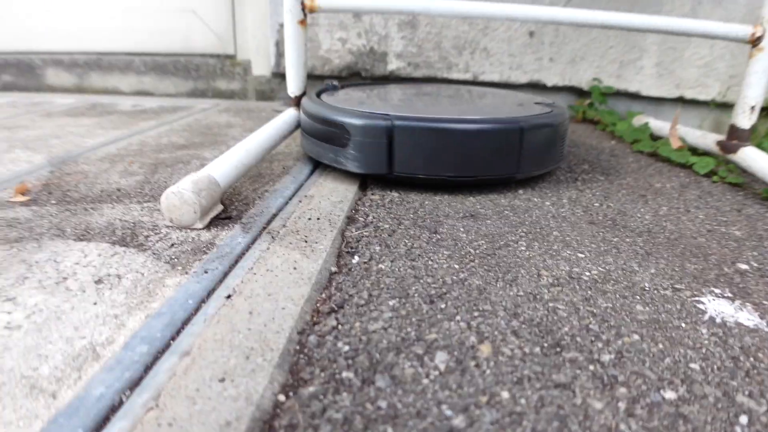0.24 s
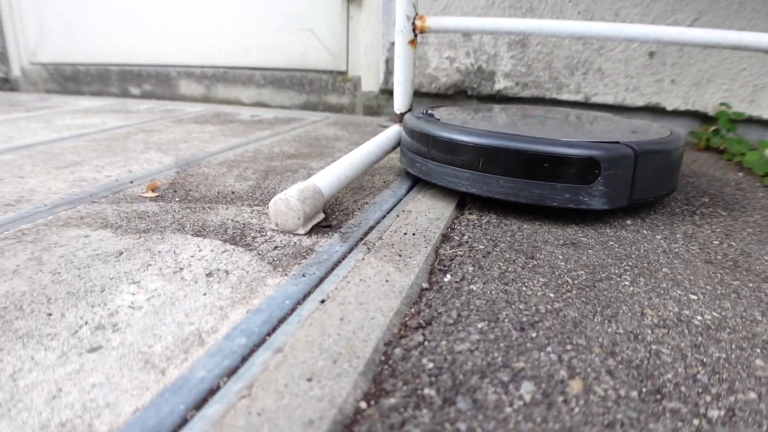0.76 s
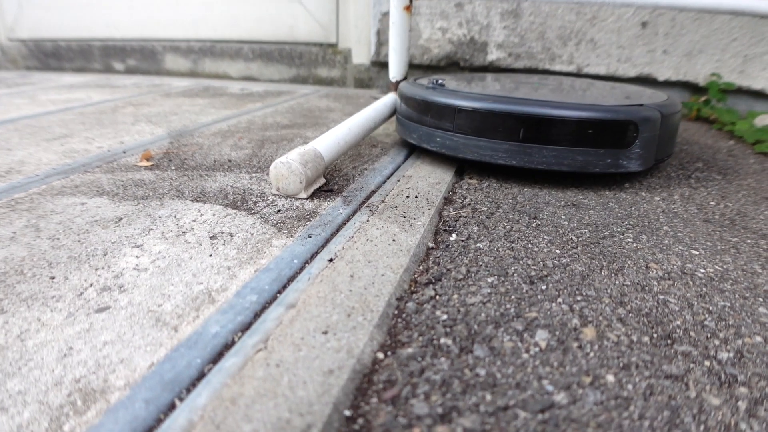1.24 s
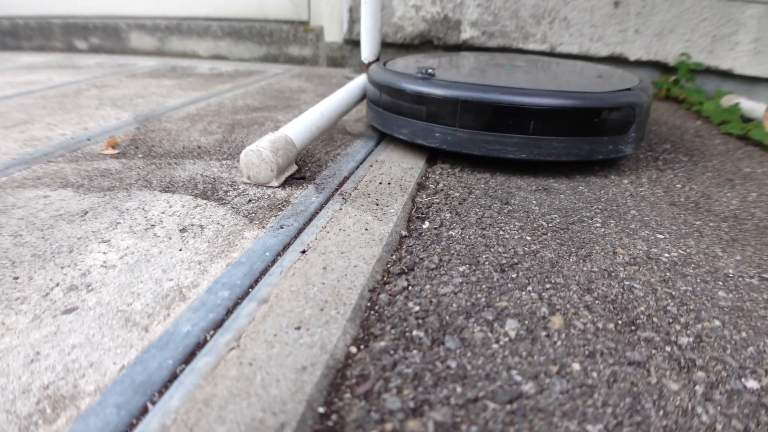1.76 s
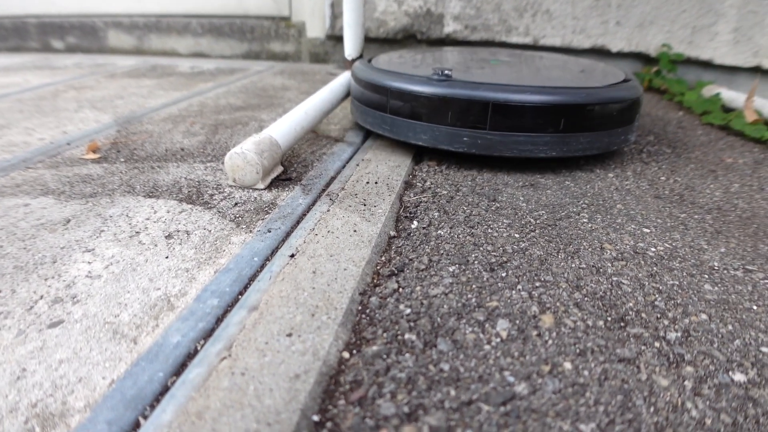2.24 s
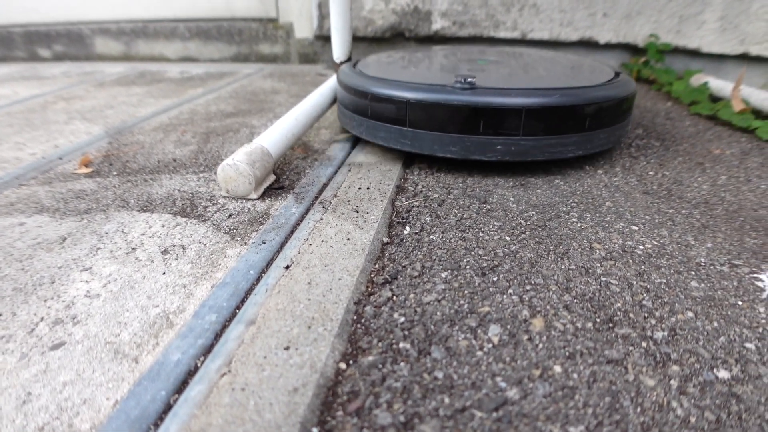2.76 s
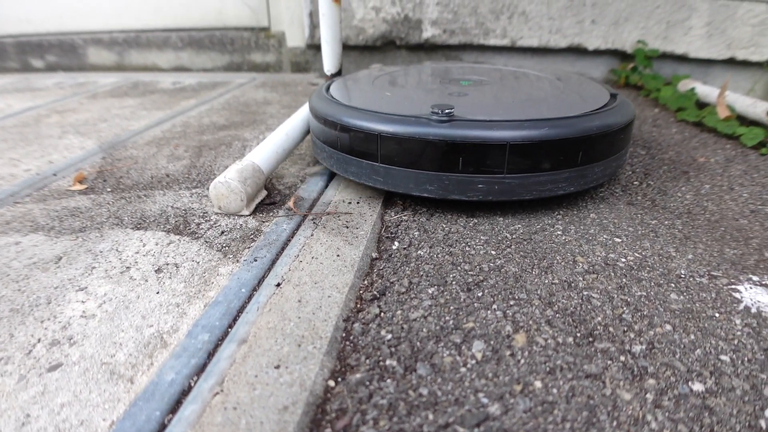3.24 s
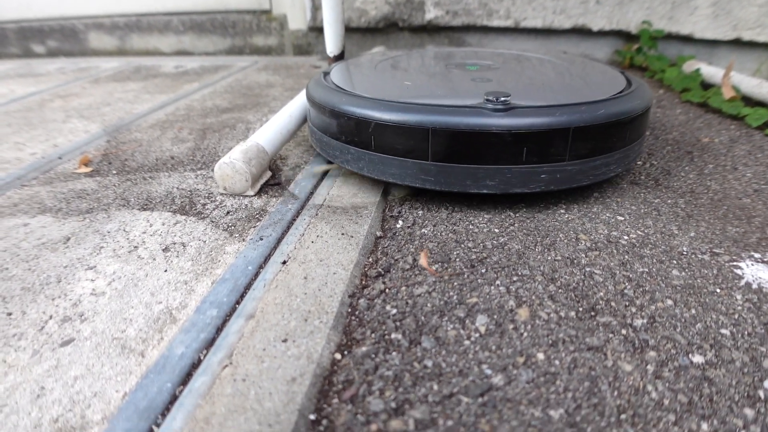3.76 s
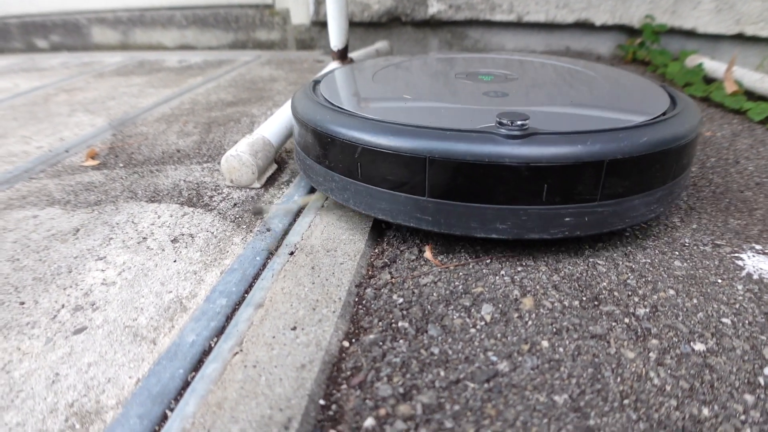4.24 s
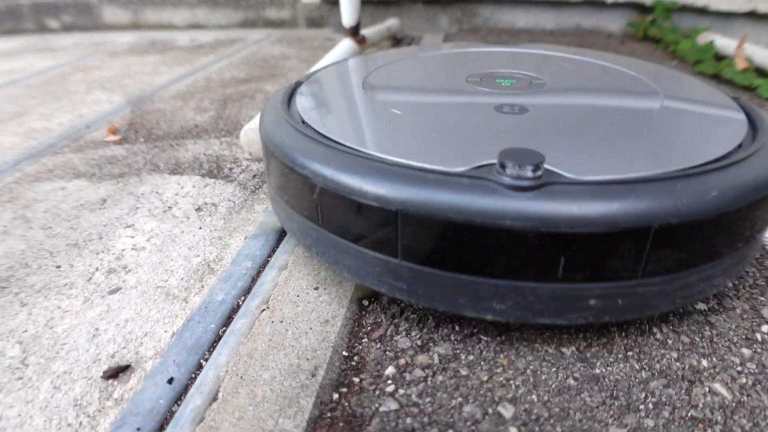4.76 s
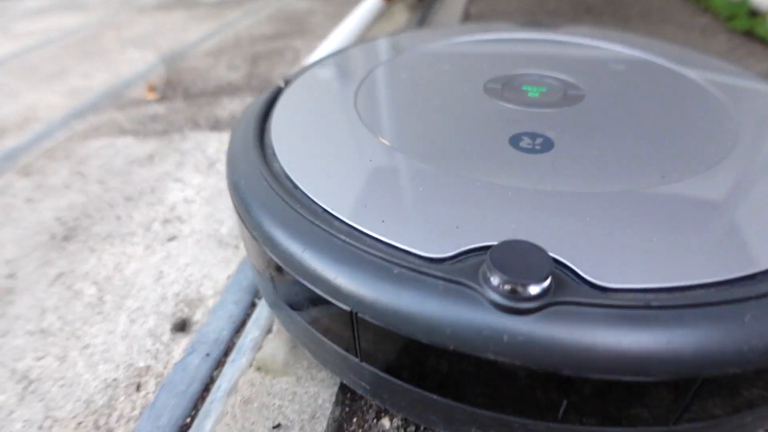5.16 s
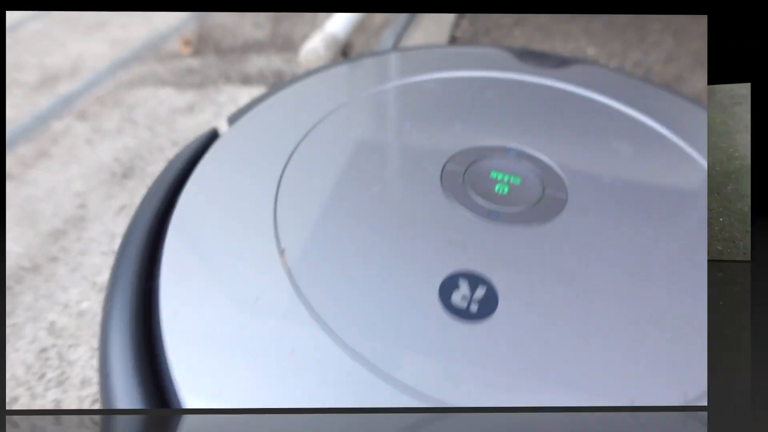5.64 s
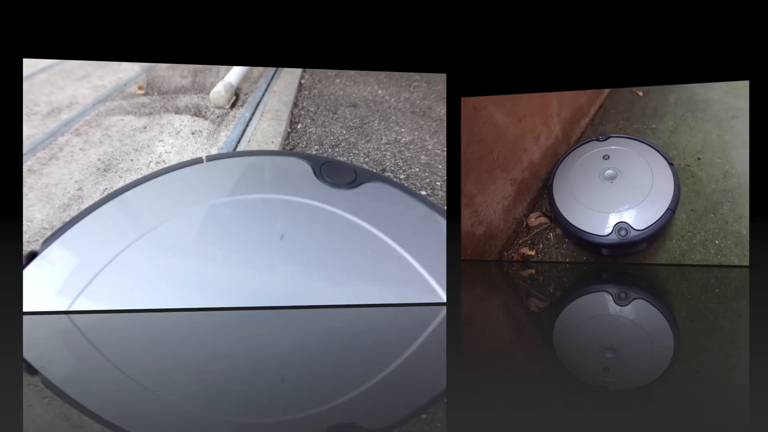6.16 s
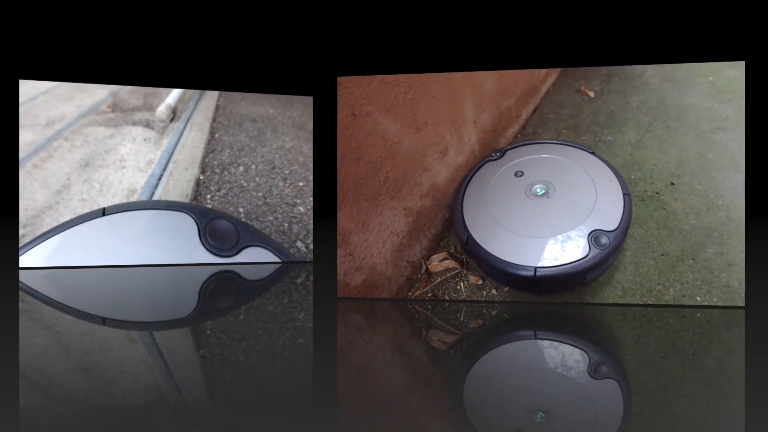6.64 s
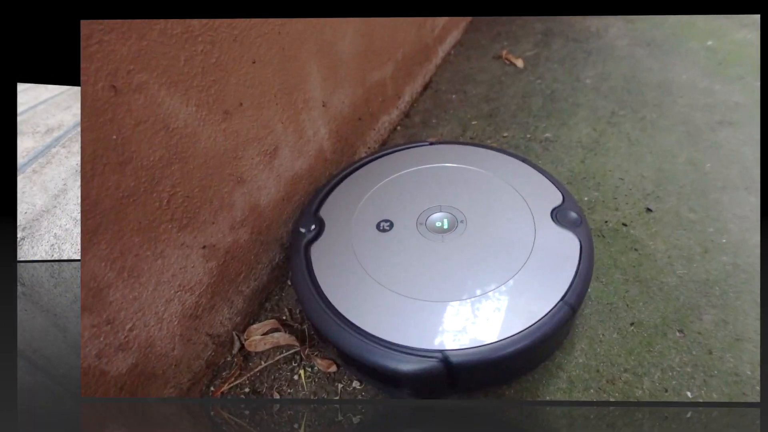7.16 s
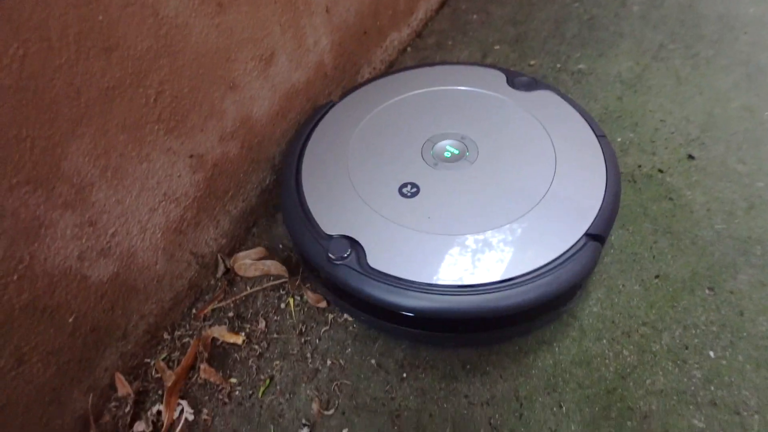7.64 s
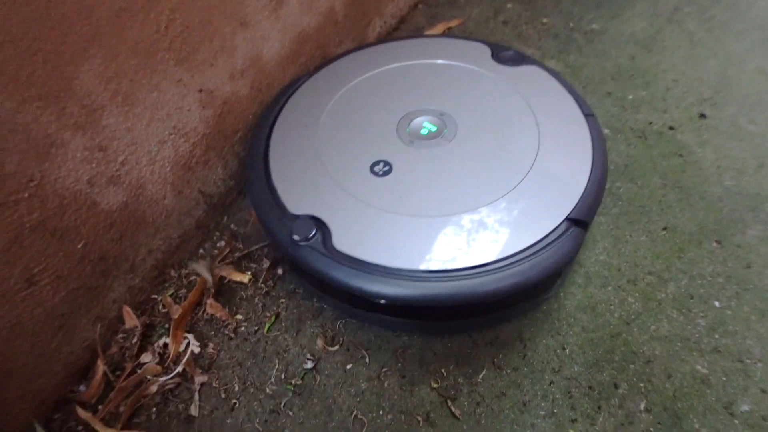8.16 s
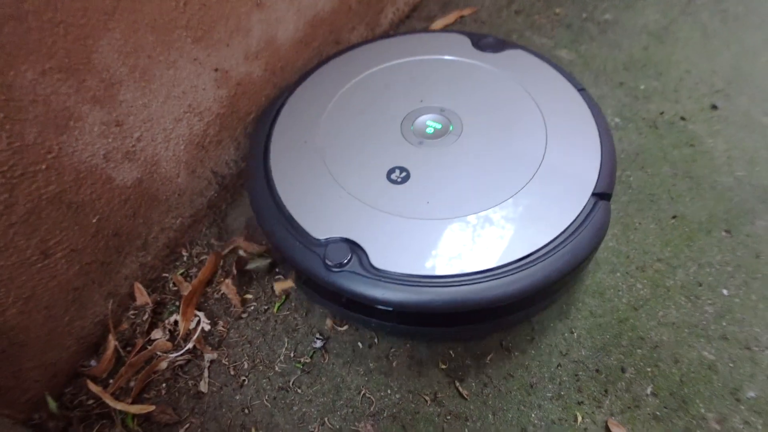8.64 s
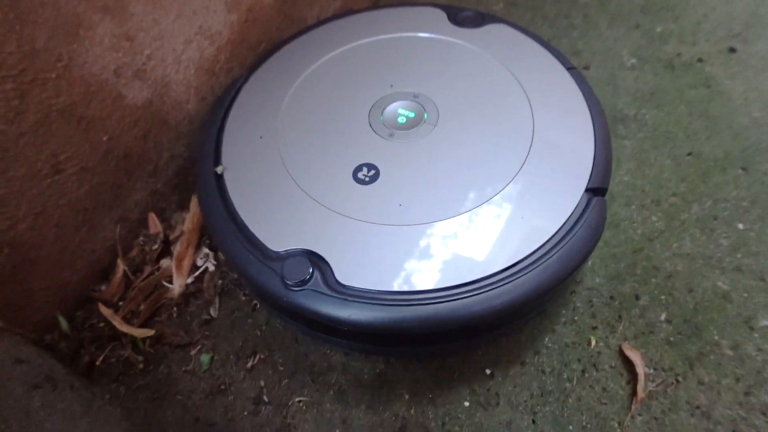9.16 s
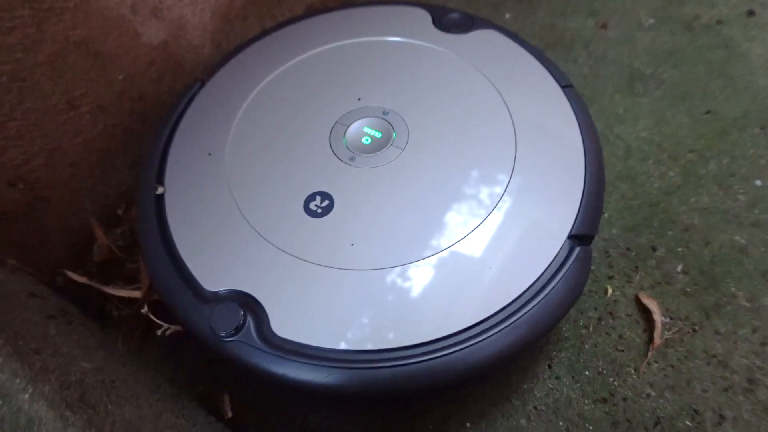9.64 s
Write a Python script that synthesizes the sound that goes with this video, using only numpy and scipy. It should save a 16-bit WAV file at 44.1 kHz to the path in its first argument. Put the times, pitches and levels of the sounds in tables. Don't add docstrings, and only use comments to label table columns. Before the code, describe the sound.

A robot vacuum whirs without pause for about ten seconds outdoors, heard by a close, almost mono microphone. From 0 s, a dense roar of air and bristles on rough paving fills the plastic shell, with a steady fan hum near 565 Hz, a fuzzy motor whine around 1.1 kHz and its fluttering octave. Roller blades beat about 33 times a second, ringing the housing near 1.9 kHz, sometimes sagging in pitch. A short bite comes at 0.2 s, knocks at 0.7 and 1.6, and a burst of bright grit ticks at 2.8-3.05. Stronger rings come from 4 to 5.5. Between 5.7 and 6.6 dull plastic knocks cluster while the roar dips and cross-fades. By 7.2 it is louder, brighter and hissier beside a wall, the fan slightly lower. Low thuds bump at 6.8, 7.5 and 8.1; dry leaves snap thickly at 7.6-8.1, then sparsely until 9.55. The whir continues to the end.

```python
import sys
import numpy as np
from scipy import signal
from scipy.fft import rfft, irfft, next_fast_len
from scipy.io import wavfile
from scipy.ndimage import uniform_filter1d, map_coordinates

SR = 44100
rng = np.random.default_rng(int(sys.argv[2]) if len(sys.argv) > 2 else 0)


def wav_record(signal):
    frames = np.transpose(np.atleast_2d(signal))
    bounded = np.clip(frames, -1, 1)
    quanta = np.round(bounded * 32767).astype(np.int16)
    wavfile.write(sys.argv[1], SR, quanta)


def invert_db(level):
    return 10 ** (np.asarray(level, dtype=float) / 20)


N = 437031
T = np.arange(N) / SR

# start t/s, end t/s
PLACE_FADE = (5.66, 7.5)
# t/s, level/dB
CLOSENESS = [(0.0, -21.5), (0.13, -22.5), (0.22, -19), (0.36, -20.5), (1.21, -18.5), (3.5, -20),
             (4.08, -18), (5.3, -18), (6.1, -22), (6.46, -22), (7.23, -15.5), (8.17, -16.5), (8.25, -15),
             (8.55, -17), (9.88, -15.5), (9.91, -16)]
# f/Hz, level per Hz/dB
PAVING_COLOUR = [(25, -45), (110, -24.5), (215, -22.5), (300, -9.5), (480, -7.5), (670, -9), (900, -7.5),
                 (1400, -8), (2900, -4), (4000, -5.5), (6000, -14.5), (8300, -23.5), (11000, -29.5),
                 (15700, -33.5)]
# f/Hz, level per Hz/dB
WALL_COLOUR = [(25, -70), (110, -15), (210, -15), (330, -3.5), (440, -9.5), (520, -2.5), (650, -12),
               (760, -7), (880, -11), (1400, -7), (2900, -1), (4600, -4), (8000, -6), (15700, -10)]
# f/Hz, width/Hz, lift/dB, from t/s, to t/s
SHELL_RESONANCES = [(1850, 960, 5.5, 0, 9.91), (2290, 280, 6, .2, 2.05), (5700, 400, 1.5, 1.5, 2.6),
                    (13050, 500, 4, 2, 2.8), (9620, 380, 5, 1.7, 5.1), (13700, 1100, 6.5, 4.3, 5),
                    (834, 200, -1.5, 1, 6.6), (3300, 1200, 0.5, 6, 10.5), (4470, 830, 5, 10.5, 10.5),
                    (11500, 2500, 6, 5.1, 5.85), (5900, 1300, 3, 5.5, 9.4), (3770, 510, 4, 0.8, 1.94),
                    (3300, 700, 3, 2.6, 4.9), (1260, 230, 2, -4.5, 2.4)]
# from t/s, to t/s, edge/s, lift/dB
UNDERSIDE_LIFTS = [
    (.5, 1.3, 0.26, 1.5),
    (4.9, 6.28, 0.66, 3.5),
]
# from t/s, to t/s, edge/s, lift/dB
VENT_LIFTS = [
    (3.95, 6.3, 0.65, -2),
    (6.5, 7, .2, 0.5),
    (8.3, 10.5, 0.4, 1.4),
    (8.5, 10.5, .22, 2.5),
    (8.5, 8.9, 0.14, 1.5),
]
FAN_SHAFT_HZ = (188.4, 177.6)
# t/s, half width/s, level/dB
FAN_THIRD_BEAMS = [
    [(.85, .45, -35), (1.5, 0.57, -35), (2.3, 0.62, -34), (3.2, 1, -32.5), (4.6, .5, -34.5),
     (5.5, 0.69, -29.5), (6.4, .5, -37)],
    [(7.3, 0.76, -28), (8.1, 0.51, -27), (8.9, 0.67, -30.5), (9.9, .3, -33)],
]
# t/s, half width/s, level/dB
FAN_FOURTH_BEAMS = [
    [(.1, 0.55, -40), (1.4, 0.95, -38.5), (2.2, 0.73, -35.5), (3.4, 0.97, -36), (4.2, 0.27, -42),
     (6.2, 0.59, -36)],
    [(6.95, 0.34, -37), (7.7, .4, -34), (8.4, 0.83, -37.5), (9.7, 0.64, -29.5)],
]
# multiple of shaft rate, level re third order/dB
FAN_WEAK_ORDERS = [
    [(1, -23), (7, -10)],
    [(2, -13), (5, -11), (7, -13)],
]
TOOTH_HZ = (1113, 1064)
# t/s, half width/s, level/dB
TOOTH_BEAMS = [
    [(.7, 0.6, -31.5), (1.4, 0.38, -32), (2.1, .9, -33), (3.3, 1.2, -37.5), (4.75, 0.48, -41),
     (5.8, 0.46, -34.5), (6.5, .5, -34), (7.05, 0.45, -28.5)],
    [(7.7, 0.39, -35), (8.35, 0.46, -32), (9.3, 0.85, -30)],
]
# t/s, half width/s, level/dB
OCTAVE_BEAMS = [
    [(0, 0.61, -30.5), (1.6, .7, -28.5), (2.9, 1.2, -31), (3.9, 0.62, -28.5), (4.6, 0.35, -26),
     (5.94, 0.86, -34)],
    [(7.92, .3, -44), (9.6, .4, -28)],
]
# t/s, half width/s, level/dB
NEIGHBOUR_BEAMS = [
    [(3.8, .4, -35.5), (4.6, 0.45, -39), (6.93, .3, -36)],
    [(9.24, .3, -47)],
]
# start t/s, length/s, first f/Hz, last f/Hz, level/dB
CLEAR_RINGS = [
    (2.0, 1.24, 1905, 1899, -27.5),
    (3.98, 0.41, 1915, 1845, -23.5),
    (4.52, 0.417, 1936, 1886, -24),
    (5.04, 0.42, 1920, 1820, -23.5),
    (7.68, 0.69, 1880, 1852, -25.5),
    (8.85, .5, 1870, 1860, -30),
]
# start t/s, length/s, first f/Hz, last f/Hz, level/dB
ROUGH_RINGS = [
    (.2, 0.09, 1860, 1830, -20.5),
    (.33, 0.24, 1850, 1800, -32),
    (1.0, 0.46, 1720, 1750, -33),
    (1.58, 0.41, 1900, 1900, -28),
    (3.25, .6, 1800, 1770, -30),
    (4.95, .35, 1880, 1850, -25),
    (5.42, .33, 1850, 1900, -26),
    (6.95, 0.66, 1773, 1873, -25.5),
    (9.5, 0.42, 1860, 1840, -26.5),
]
# t/s, peak level/dB, ring f/Hz
GRIT_TICKS = [(0.204, -10, 6900), (0.5177, -22, 4800), (1.0924, -16, 6340), (1.1772, -12, 5650),
              (1.8312, -12, 4730), (2.164, -13, 4660), (2.8054, -15, 6760), (2.817, -2.5, 5750),
              (2.82, -8, 4600), (2.9766, -5, 8000), (2.9834, -6, 6540), (3.049, -5, 5630),
              (5.942, -14, 3530), (6.149, -18, 3300)]
# t/s, peak level/dB, ring f/Hz
LEAF_SNAPS = [(6.9174, -12, 7700), (7.4658, -16, 7600), (7.6094, -3, 7500), (7.6934, -3, 10200),
              (7.7543, 0, 10600), (7.9422, -5, 10500), (7.9596, -6, 10600), (8.0055, -4, 10700),
              (8.0286, -4, 11700), (8.0586, -2.5, 8920), (8.1304, -13, 7650), (8.5314, -8, 10570),
              (8.5594, -4, 10900), (9.1094, -9, 9700), (9.4644, -2, 7530), (9.552, -5, 7530)]
# t/s, peak level/dB, ring f/Hz
BUMPER_KNOCKS = [(0.73, -7, 1090), (1.144, -23, 1380), (1.555, -8, 1630), (2.174, -12, 1500),
                 (4.646, -13, 1450), (5.685, -15.5, 560), (5.809, -12, 770), (5.942, -11.5, 1500),
                 (6.03, -7, 855), (6.091, -7.5, 890), (6.115, -11, 976), (6.149, -13, 1240),
                 (6.163, -12, 400), (6.248, -11.5, 1000), (6.264, -10.5, 407), (6.575, -12, 560),
                 (7.655, -19, 531), (8.641, -23, 524)]
# t/s, peak level/dB
CHASSIS_THUDS = [(0.632, -46), (2.953, -45), (4.978, -40), (5.454, -40), (6.148, -39), (6.253, -45),
                 (6.822, -26), (7.491, -26), (7.62, -42), (8.042, -35), (8.125, -30), (.27, -34),
                 (4.39, -36)]
# f/Hz, side under mid level/dB
SIDE_COLOUR = [
    [(40, -34), (100, -10), (250, -20), (900, -41), (1900, -27.5), (2900, -31), (4000, -25.5), (6000, -36),
     (15000, -38)],
    [(40, -34), (100, -7), (250, -18), (500, -21.5), (800, -13.5), (1900, -26.5), (2900, -24), (4000, -21),
     (6000, -34), (15000, -29)],
]
# t/s, share of mid in the side (positive leans left), width level/dB
STEREO_LEAN = [(0, -1, -6), (.3, -1.1, 2), (2.2, -0.92, 2), (3, -0.78, -2.5), (4.5, -0.88, 0.5),
               (6, -0.44, 1), (7, -0.24, 3), (7.8, -0.21, -2.5), (9.91, 0.65, -1.5)]


def roar(slaps):
    grains = (rng.random(N) < .04) * rng.standard_normal(N)
    grains = grains * invert_db(4.6 * rng.exponential(size=N).clip(0, 3))
    wall_share = place()
    source = rng.standard_normal(N) + invert_db(-12.0 + 3.7 * wall_share) * unit(grains)
    source = patchy(source, depth_db=0.58, streaks_db=1.5, resonances=SHELL_RESONANCES)
    paving = unit(filtered(source, lambda f: invert_db(along(PAVING_COLOUR, f))))
    wall = unit(filtered(source, lambda f: invert_db(along(WALL_COLOUR, f))))
    noise = (1 - wall_share) * paving + wall_share * wall

    ribs_hz = 154.2 * (1 + 0.0307 * wobble(3))
    ribs = np.sin(2 * np.pi * np.cumsum(ribs_hz) / SR)
    ground_db = 0.12 * wobble(9.2) + .5 * wobble(30) + 0.71 * wobble(65)
    jolts_db = ground_db + 3.0 * (slaps - 1) + .5 * ribs

    below = [filtered(noise, lambda f: 1 / (1 + (f / edge_hz) ** 8)) for edge_hz in (235, 1450, 5500)]
    bands = [below[0], below[1] - below[0], below[2] - below[1], noise - below[2]]
    shakes = (.3, 0.95, 0.42, 0.7)
    own_db = (2.5, 0.34, 0.1, 0.35)
    trims_db = (-1.0, -2.0, -1.5, -1.04)
    out = np.zeros(N)
    for band, db, shake, own, trim_db in zip(bands, register_levels(), shakes, own_db, trims_db):
        band = band * invert_db(shake * jolts_db + own * wobble(16))
        slow_power = np.abs(uniform_filter1d(band ** 2, size=SR // 6))
        out += invert_db(db + trim_db) * band / np.sqrt(slow_power + 1e-12)
    return out


def register_levels():
    near_db = curves(CLOSENESS)[0]
    mean_db = near_db.mean()
    underside_db = lifts(UNDERSIDE_LIFTS)
    offsets_db = (-30.5, -5.5, 0, -6)
    follows = (.3, .8, 1, 1.05)
    headings_db = (underside_db, underside_db, 0, lifts(VENT_LIFTS))
    return [mean_db + offset + share * (near_db - mean_db) + heading
            for offset, share, heading in zip(offsets_db, follows, headings_db)]


def fan():
    out = np.zeros(N)
    heard = (place() < 1, place() > 0)
    for shaft_hz, third, fourth, weak, gate in zip(FAN_SHAFT_HZ, FAN_THIRD_BEAMS, FAN_FOURTH_BEAMS,
                                                   FAN_WEAK_ORDERS, heard):
        third_db = beams(third)
        orders = [(3, third_db), (4, beams(fourth))]
        orders += [(k, third_db + db) for k, db in weak]
        for k, db in orders:
            out += gate * tone(k * shaft_hz, db, drift_hz=2.2, rate=14, shake_db=0.0)
    return out


def brush_motor(slaps):
    out = np.zeros(N)
    heard = (place() < 1, place() > .9)
    for hz, teeth, upper, beside, gate in zip(TOOTH_HZ, TOOTH_BEAMS, OCTAVE_BEAMS, NEIGHBOUR_BEAMS, heard):
        tooth = tone(hz, beams(teeth), drift_hz=4.91, rate=22, shake_db=2.5)
        neighbour = tone(4 / 3 * hz, beams(beside), drift_hz=4, rate=15, shake_db=2)
        octave = tone(2 * hz, beams(upper), drift_hz=28.07, rate=40, shake_db=2.5)
        out += gate * (tooth + neighbour + slaps * octave)
    return out


def roller():
    beat_hz = 33 * (1 + 0.0263 * wobble(4))
    beats = np.cumsum(beat_hz) / SR
    size = invert_db(0.27 * rng.standard_normal(N // 500))[beats.astype(int)]
    slap = size * (0.31 + np.exp(-3 * (beats % 1)))
    return unit(uniform_filter1d(slap, size=SR // 130))


def housing(slaps):
    idle_hz = 1840 + 151.4 * wobble(140)
    idle_db = curves(CLOSENESS)[0] - 18.5
    idle = tone(idle_hz, idle_db, drift_hz=30.15, rate=3, shake_db=0.5)
    bites = rings(CLEAR_RINGS, smear_hz=20) + rings(ROUGH_RINGS, smear_hz=71.8)
    return unit(slaps ** 1.16) * (idle + bites)


def rings(rows, smear_hz):
    pitch_points = []
    gain = np.zeros(N)
    for start, length, first_hz, last_hz, db in rows:
        pitch_points += [(start, first_hz), (start + length, last_hz)]
        gain += invert_db(db) * during(start, start + length, edge=0.14)
    hz = curves(pitch_points)[0] + smear_hz * wobble(140)
    return gain * tone(hz, 0, drift_hz=3.93, rate=14, shake_db=1.0)


def debris():
    stones = strikes(GRIT_TICKS, t60=.03, noisy=.62, trim_db=4)
    leaves = strikes(LEAF_SNAPS, t60=.022, noisy=.8, trim_db=6, rise=.1)
    return filtered(stones + leaves, lambda f: f ** 2 / (f ** 2 + 2500 ** 2) / (1 + (f / 12000) ** 2))


def knocks():
    hits = strikes(BUMPER_KNOCKS, t60=.02, noisy=0.11, trim_db=5, rise=0.041)
    return filtered(hits, lambda f: f ** 2 / (f ** 2 + 250 ** 2))


def thuds():
    rows = [(s, db, 110) for s, db in CHASSIS_THUDS]
    return strikes(rows, t60=0.14, noisy=0, trim_db=-3.5)


def strikes(rows, t60, noisy, trim_db, rise=0.091):
    out = np.zeros(N + SR)
    t = np.arange(SR // 10) / SR
    shape = invert_db(-60 * t / t60) * (1 - np.exp(-t / (rise * t60)))
    modes = ((.78, .7), (1, 1), (1.6, .75))
    for s, db, hz in rows:
        ring = sum(size * np.sin(2 * np.pi * ratio * hz * t) for ratio, size in modes)
        blend = (1 - noisy) * ring + noisy * rng.standard_normal(len(t))
        out[round(s * SR):][:len(t)] += invert_db(db + trim_db) * shape * blend
    return out[:N]


def sides(mid):
    n = np.arange(20000)
    scatter = rng.standard_normal(len(n)) * invert_db(-30 * n / len(n))
    lean, width_db = curves(STEREO_LEAN)
    side = signal.fftconvolve(mid, scatter / np.linalg.norm(scatter))[:N] + lean * mid
    side = invert_db(width_db) * patchy(side, depth_db=5.5, streaks_db=2.5)
    paving, wall = (filtered(side, lambda f: invert_db(along(colour, f))) for colour in SIDE_COLOUR)
    side = (1 - place()) * paving + place() * wall
    return filtered(side, lambda f: f / (f + 250))


def place():
    start, end = PLACE_FADE
    return np.clip((T - start) / (end - start), 0, 1)


def tone(hz, db, drift_hz, rate, shake_db):
    phase = 2 * np.pi * np.cumsum(hz + drift_hz * wobble(rate)) / SR
    gain = np.sqrt(2) * invert_db(db + shake_db * wobble(rate))
    return gain * np.sin(phase + rng.uniform(0, 2 * np.pi))


def beams(rows):
    between_db, edge_db = -50.5, 10.5
    coarse = T[::256]
    power = sum(invert_db(db - edge_db * ((coarse - s) / width) ** 2) ** 2 for s, width, db in rows)
    return np.interp(T, coarse, 10 * np.log10(power + invert_db(between_db) ** 2))


def patchy(x, depth_db, streaks_db, resonances=()):
    f, t, z = signal.stft(x, SR, nperseg=1024, noverlap=768)

    def field(tall, long):
        grain = uniform_filter1d(rng.standard_normal(z.shape), size=tall, axis=0)
        return unit(uniform_filter1d(grain, size=long, axis=1))

    gain_db = depth_db * field(16, 4) + streaks_db * field(2, 24)
    for hz, width, db, start, end in resonances:
        facing = np.clip(np.minimum(t - start, end - t) / 0.098 + .5, 0, 1)
        gain_db = gain_db + db * facing / (1 + (2 * (f[:, None] - hz) / width) ** 2)
    return signal.istft(z * invert_db(gain_db), SR, nperseg=1024, noverlap=768)[1][:N]


def during(start, end, edge):
    return np.clip(np.minimum(T - start, end - T) / edge + .5, 0, 1)


def lifts(rows):
    return sum(db * during(start, end, edge) for start, end, edge, db in rows)


def wobble(rate):
    coarse = T[::32]
    knots = rng.standard_normal(int(N * 400 / SR) + 4)
    return np.interp(T, coarse, map_coordinates(knots, [coarse * rate]))


def filtered(x, response):
    m = next_fast_len(N + 8192)
    return irfft(rfft(x, m) * response(np.fft.rfftfreq(m, 1 / SR)), m)[..., :N]


def along(points, hz):
    f, v = np.transpose(points)
    return np.interp(np.log(hz + 1), np.log(f + 1), v)


def curves(rows):
    s, *cols = np.transpose(rows)
    return [np.interp(T, s, c) for c in cols]


def unit(x):
    return x / np.sqrt(np.mean(x ** 2) + 1e-20)


def scene():
    slaps = roller()
    mid = roar(slaps) + fan() + brush_motor(slaps) + housing(slaps)
    mid += debris() + knocks() + thuds()
    side = sides(mid)
    return np.array([mid + side, mid - side])


def low_pass(x):
    return signal.sosfilt(signal.butter(12, 16450, fs=SR, output="sos"), x)


def record(dry):
    held = dry / (1 + np.abs(dry / .85) ** 5) ** (1 / 5)
    mix = filtered(held, lambda f: (f < 15800) * f ** 2 / (f ** 2 + 35 ** 2))
    return low_pass(mix)


dry = scene()
out = record(dry)
wav_record(out)
```